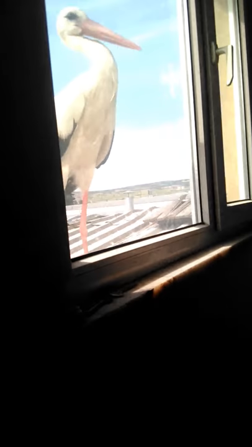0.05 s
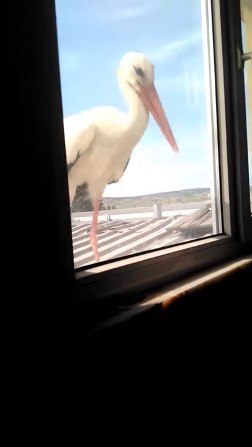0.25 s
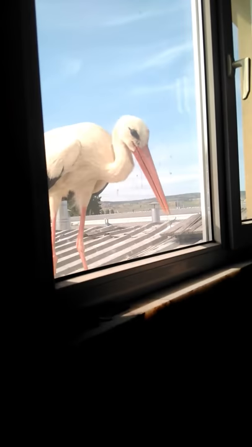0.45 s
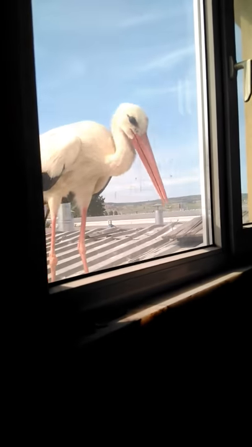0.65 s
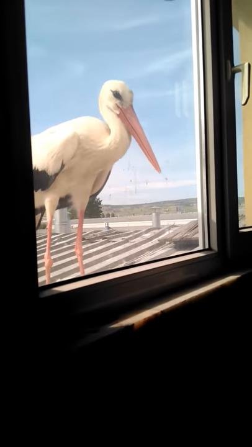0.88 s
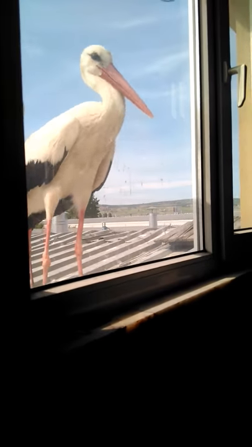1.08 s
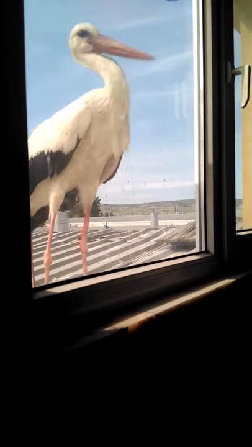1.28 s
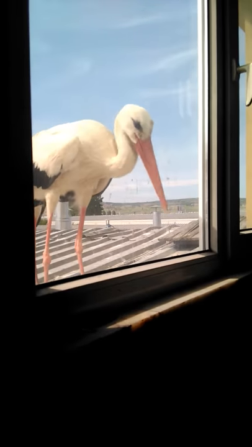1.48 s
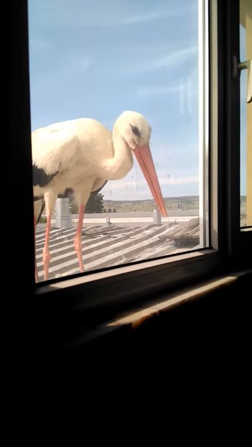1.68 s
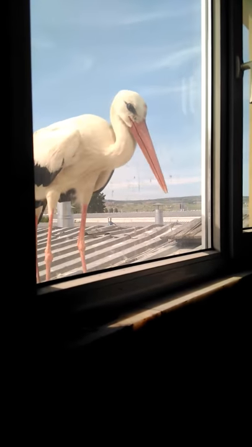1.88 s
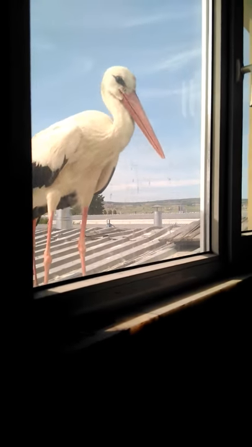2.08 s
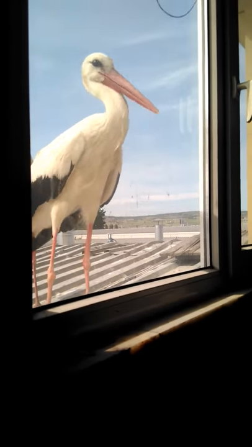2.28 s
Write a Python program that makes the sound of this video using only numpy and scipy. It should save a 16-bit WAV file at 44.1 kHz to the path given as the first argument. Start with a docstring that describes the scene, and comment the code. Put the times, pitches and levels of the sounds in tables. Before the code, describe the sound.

Two booming taps of a bird's beak on window glass ring through a bare room.

```python
"""A bare, quiet room, where a stork outside knocks twice with its bill on the closed window.
Each knock is a crack of the bill's tip, a short clack from the high modes of the glass and a dull
boom from the deep ones; the room rings on for over a second. It opens on the faint, fading ring of
an earlier knock, then a soft hissing rustle. Tiny creaks sound close by, and a low rumble, drone
and hum lie underneath."""
import sys
import numpy as np
from scipy import signal
from scipy.fft import rfft, irfft
from scipy.io import wavfile

SR = 44100
rng = np.random.default_rng(int(sys.argv[2]) if len(sys.argv) > 2 else 0)


def bounce(signal):
    """Save signal as a 16-bit WAV file at the path given by the first command-line argument."""
    frames = np.transpose(np.atleast_2d(signal))
    limited = np.clip(frames, -1, 1)
    pcm = np.round(limited * 32767).astype(np.int16)
    wavfile.write(sys.argv[1], SR, pcm)


N = 108045
TIME_S = np.arange(N) / SR
BIN_HZ = np.maximum(np.arange(N // 2 + 1) * SR / N, 1)
ATTACK_S = 0.00084


def from_db(db):
    """Decibels to gain."""
    return 10 ** (np.asarray(db) / 20)


def unit_rms(x):
    """Scale to rms 1."""
    return x / np.sqrt(np.mean(x ** 2) + 1e-20)


def at_hz(table, hz, column=1):
    """Read a table column on a log-frequency axis."""
    table = np.array(table)
    return np.interp(np.log(hz), np.log(table[:, 0]), table[:, column])


def pan(db):
    """Channel gains for a left-minus-right level."""
    return from_db(np.array([[.5], [-.5]]) * db)


def fade(t60_s):
    """Exponential decay."""
    return from_db(-60 * TIME_S / t60_s)


def rise(tau_s):
    """Smooth onset."""
    return 1 - np.exp(-TIME_S / tau_s)


def add(out, start_s, sound):
    """Mix a sound in at a given time."""
    i = int(start_s * SR)
    out[:, i:i + sound.shape[1]] += sound[:, :N - i]


# Stereo field of the room. Each row: frequency in Hz, channel likeness 0-1, pan in dB.
STEREO_FIELD = [(61.3, 0.24, 2), (150, 1, -1.5), (342, 0.62, -2), (650, 0.42, 0.5), (1260, 0, -0.5),
                (2900, 0.19, -1), (6200, 0, 2), (13000, 0.17, 0)]

def stereo_spectrum():
    """White noise spectrum, alike in both channels in the upper bass, nearly unrelated in the treble."""
    mid, side = rfft(rng.standard_normal((2, N)))
    alike = np.clip(at_hz(STEREO_FIELD, BIN_HZ), -.99, .99)
    channels = np.sqrt(1 + alike) * mid + np.sqrt(1 - alike) * side * [[1], [-1]]
    return channels * pan(at_hz(STEREO_FIELD, BIN_HZ, column=2))


def noise(colour):
    """Coloured stereo noise, rms 1."""
    return unit_rms(irfft(stereo_spectrum() * from_db(at_hz(colour, BIN_HZ)), N))


def wavering_tone(hz, waver_hz=7.2, depth_rad=0.63):
    """Sine with a slowly wandering phase, rms 1."""
    slow_spectrum = rfft(rng.standard_normal(N)) * np.exp(-(BIN_HZ / waver_hz) ** 2)
    wander = unit_rms(irfft(slow_spectrum, N))
    return np.sqrt(2) * np.sin(2 * np.pi * hz * TIME_S + depth_rad * wander)


# Rumble spectrum. Each row: frequency in Hz, relative level in dB.
RUMBLE_SPECTRUM = [(15, -30), (30, -17), (48, 3.5), (62, -12.5), (78, 1.5), (100, -11.5), (145, -1.5),
                   (200, -9), (265, -13), (450, -21.5), (900, -31), (2200, -31), (8000, -36),
                   (10500, -35.5), (13500, -33)]
# Drone envelope. Each row: time in seconds, level in dB.
DRONE_ENVELOPE = [(0, -55.5), (.07, -77.5), (.13, -57), (.8, -67), (1.05, -60.5), (1.2, -54.5), (1.28, -74),
                  (1.6, -59.5), (2.03, -57.5), (2.15, -66.5), (2.27, -60.5), (2.45, -56.5)]
# Hum tones. Each row: frequency in Hz, level in dB.
HUM_TONES = [(146.5, -65.5), (264, -69.5)]

def background(rumble_db=-61, drone_hz=70.6):
    """Low rumble with faint hiss, a drone that swells and dips, and a wavering hum."""
    drone = from_db(np.interp(TIME_S, *np.transpose(DRONE_ENVELOPE))) * wavering_tone(drone_hz)
    hum = sum(from_db(db) * wavering_tone(hz) for hz, db in HUM_TONES)
    return from_db(rumble_db) * noise(RUMBLE_SPECTRUM) + drone + hum


# Envelope of the knock tail (first 0.14 s), then the rustle. Each row: time in seconds, level in dB.
TAIL_AND_RUSTLE_ENVELOPE = [(0, -58.5), (.13, -63.5), (.26, -65), (.38, -61.5), (.52, -63), (.6, -67),
                            (.8, -70), (2.45, -71)]
# Spectrum of both. Each row: frequency in Hz, relative level in dB.
TAIL_AND_RUSTLE_SPECTRUM = [(300, 3), (700, 5), (1200, 1), (2000, -1), (4000, -6.5), (7800, 1),
                            (10000, -6.5), (14000, -6.5)]

def knock_tail_and_rustle():
    """The faint, fading ring of an earlier knock, then a soft hissing rustle."""
    envelope = from_db(np.interp(TIME_S, *np.transpose(TAIL_AND_RUSTLE_ENVELOPE)))
    return envelope * noise(TAIL_AND_RUSTLE_SPECTRUM)


# Single slips. Each row: start in seconds, level in dB before gain_db.
SLIPS = [(0.156, -48), (0.1757, -49), (0.19, -51), (0.199, -49.5), (0.229, -48), (0.339, -49),
         (0.3755, -48), (0.397, -49), (0.4874, -50.5), (0.5152, -51.5), (0.521, -51.5), (0.5487, -52),
         (0.872, -54), (0.876, -53), (0.8975, -50), (1.0251, -51.5), (1.031, -50), (1.045, -56),
         (1.056, -55), (1.08, -51), (1.52, -50), (1.536, -53), (1.561, -49.5), (1.739, -52.5), (1.762, -53),
         (1.801, -50), (2.2987, -50), (2.362, -52), (2.382, -50.5), (2.4237, -50.5)]
# Spectrum of a slip. Each row: frequency in Hz, relative level in dB.
SLIP_SPECTRUM = [(2000, -30), (3700, -23), (4700, -11.5), (6900, -1.5), (7900, -4.5), (8600, 1.5),
                 (9300, -12), (11000, -10.5), (12200, -5.5), (12700, -2.5), (13300, -1), (14300, -3.5)]

def creaks(run_start_s=.9037, run_end_s=1.008, gap_s=.0075, run_db=-51.5, gain_db=1):
    """Dry, bright ticks, mostly on the left: single slips and one quick, uneven run."""
    grain = noise(SLIP_SPECTRUM) * pan(db=5)
    gaps_s = gap_s * rng.uniform(.65, 1.35, size=30)
    starts_s = run_start_s + np.append(0, np.cumsum(gaps_s))
    levels_db = rng.normal(run_db, 1, size=31)
    run = [(start_s, db) for start_s, db in zip(starts_s, levels_db) if start_s < run_end_s]
    tail = from_db(-11) * fade(t60_s=.09)
    envelope = (fade(t60_s=.0056) + tail)[None, :SR // 10]
    power = np.zeros((2, N))
    for start_s, db in SLIPS + run:
        add(power, start_s, (from_db(db + gain_db) * envelope) ** 2)
    return np.sqrt(power) * grain


# Spectrum of the bill's tip on glass. Each row: frequency in Hz, relative level in dB.
TIP_SPECTRUM = [(2500, -22), (3600, -2), (4700, 2), (5700, -4), (8000, -9), (11000, -26)]

def bill_tip(crack_db, skid_db, skid_delay_s=0.052, skid_width_s=0.009):
    """The hard tip lands with a bright crack and slides on the glass a moment later."""
    crack = from_db(crack_db) * rise(ATTACK_S) * fade(t60_s=0.04)
    skid = from_db(skid_db) * np.exp(-((TIME_S - skid_delay_s) / skid_width_s) ** 2)
    return (crack + skid) * noise(TIP_SPECTRUM)


# High glass modes. Each row: frequency in Hz, relative clack level in dB, lift of reflections in dB.
GLASS_MODES = [(610, -48, 10.5), (711, -38, 7), (753.6, -63, 7.5), (827, -58, 10), (869, -37, 10),
               (927.6, -40.5, 15.5), (1080, -65, 0.5), (1165, -42, 8.5), (1256, -31, 10.5), (1333, -40, 11),
               (1633, -58, 7.5), (1860, -47, 9), (2110, -49, 11), (2282, -47, 13.5), (3148, -54, 9.5),
               (3280, -44.5, -10), (3400, -50, 14.5), (3583, -52, 13.5), (4303, -63, 15), (4700, -63, 10.5),
               (5050, -69, 4), (5140, -64, 7)]

def clack(t60_at_1khz_s=0.094):
    """Hard contact rings the glass; high modes die sooner, and each channel has its own phases."""
    rings = 0
    for hz, db, _ in GLASS_MODES:
        phases = rng.uniform(0, 2 * np.pi, (2, 1))
        t60_s = t60_at_1khz_s * (hz / 1000) ** -0.45
        rings += from_db(db) * fade(t60_s) * np.sin(2 * np.pi * hz * TIME_S + phases)
    return rise(tau_s=0.0025) * pan(db=-5) * rings


def glass_colour(width_at_1khz_hz=18.6):
    """Gain curve that the glass modes impose on the sound sent into the room."""
    gain = 1
    for hz, _, lift_db in GLASS_MODES:
        width_hz = width_at_1khz_hz * (hz / 1000) ** 0.65
        gain += (from_db(lift_db) - 1) / (1 + (2 * (BIN_HZ - hz) / width_hz) ** 2)
    return gain


# Deep modes of pane and room. Each row: frequency in Hz, relative level in dB, T60 in seconds, pan in dB.
PANE_MODES = [(68.1, -35.5, 0.85, -2.5), (79.2, -40, 0.9, -4), (151, -41.5, 1, -7), (174, -29, 1.13, -1.5),
              (217.2, -34.5, 1.1, -6), (226.4, -27, 1.217, -3.5), (251, -29, 0.63, 2),
              (261.9, -34.5, 1.77, 0), (279.2, -34, 1.7, -3.5), (293.9, -35, 1.48, -1),
              (333, -35, 0.68, -7), (356, -37, 1.546, 3), (391.7, -36, 1.13, -12.5),
              (474.6, -39.5, 0.42, -3), (486, -35.5, 0.5, -8), (516.8, -33, 0.18, 6)]

def pane_boom(left_lag_s=0.00038):
    """The glass is pushed in with a thud, and modes of alternating sign swell as the blow spreads."""
    def mode(hz, db, t60_s, pan_db):
        swing = np.sin(2 * np.pi * hz * (TIME_S - [[left_lag_s], [0]]))
        return from_db(db) * pan(pan_db) * fade(t60_s) * swing
    rings = sum((-1) ** k * mode(*row) for k, row in enumerate(PANE_MODES))
    thud = mode(hz=268.6, db=-20, t60_s=0.2, pan_db=-8)
    return rise(tau_s=0.0023) * (rings - thud)


# Room response. Each row: frequency in Hz, relative early and late levels in dB, late T60 in seconds.
ROOM_BANDS = [(50.6, -58, -55, 1.32), (74, -35, -48, 1.77), (110, -42, -46.5, 1.5), (190, -49, -42, 1.1),
              (274, -30, -37.5, 1.46), (367, -29, -38, 1.28), (470, -26, -38, 1.123), (582, -43, -49, 0.99),
              (787, -42.5, -44, 1.22), (1120, -32.5, -45.5, 1.55), (1275, -43, -49.5, 0.99),
              (1484, -57.5, -52.5, 1.46), (2700, -50.5, -57, 1.15), (3670, -50.5, -54.5, 1.12),
              (4470, -58.5, -58.5, 1.12), (8000, -74, -55.5, 0.72), (12400, -72, -74.5, 1.4)]

def room_ring(reflections, low_build_s=0.0061, treble_build_s=0.025):
    """A burst of early reflections, then reverberation that builds up and dies band by band."""
    out, edges_hz = 0, np.geomspace(42, 16000, 27)
    for low, high in zip(edges_hz, edges_hz[1:]):
        hz = np.sqrt(low * high)
        band = irfft(reflections * ((BIN_HZ >= low) & (BIN_HZ < high)), N)
        early_db, late_db, late_t60_s = (at_hz(ROOM_BANDS, hz, column) for column in (1, 2, 3))
        build_s = np.interp(hz, [2000, 6000], [low_build_s, treble_build_s])
        early = from_db(early_db) * rise(ATTACK_S) * fade(t60_s=0.14)
        late = from_db(late_db) * rise(build_s) * fade(late_t60_s)
        envelope = np.hypot(early, late)
        out += unit_rms(band * envelope) * np.sqrt(np.mean(envelope ** 2))
    return out


# Bill on glass. Each row: start in seconds, then body gain, extra clack gain, crack and skid levels in dB.
BLOWS = [(0.2298, -1.5, 3, -58, -59), (1.3782, -1.5, 2, -48.5, -52.5)]

def knocks(fresh_share=0.22):
    """Both blows land on nearly the same spot, so they share most of their reflections."""
    out, shared = np.zeros((2, N)), stereo_spectrum()
    boom, contact, colour = pane_boom(), clack(), glass_colour()
    for start_s, body_db, clack_db, crack_db, skid_db in BLOWS:
        reflections = np.sqrt(1 - fresh_share) * shared + np.sqrt(fresh_share) * stereo_spectrum()
        body = boom + from_db(clack_db) * contact + room_ring(colour * reflections)
        add(out, start_s, from_db(body_db) * body + bill_tip(crack_db, skid_db))
    return out


def scene():
    """Everything heard inside the room."""
    return knocks() + creaks() + knock_tail_and_rustle() + background()


def record(dry, cutoff_hz=14200):
    """Steep low-pass."""
    return signal.sosfilt(signal.ellip(10, .2, 70, cutoff_hz, fs=SR, output="sos"), dry)


dry = scene()
out = record(dry)
bounce(out)
```